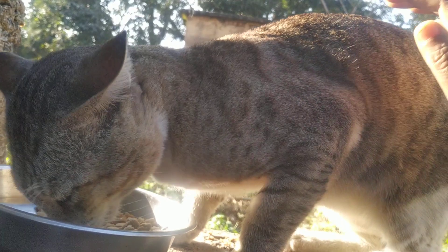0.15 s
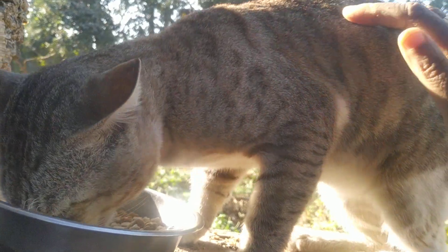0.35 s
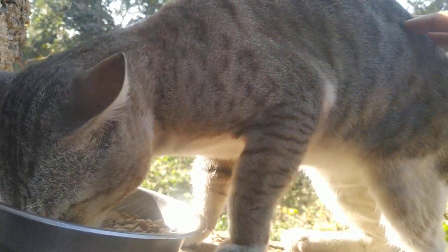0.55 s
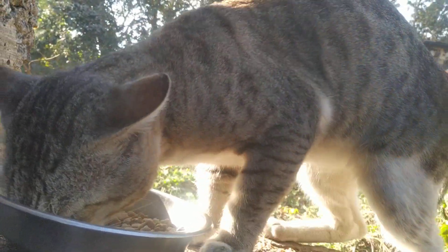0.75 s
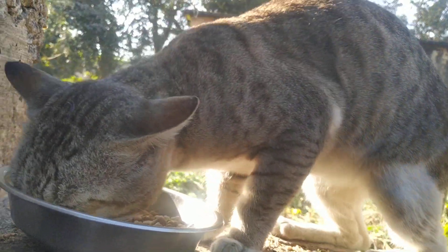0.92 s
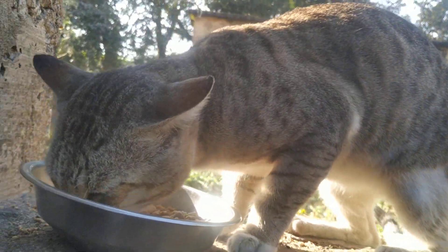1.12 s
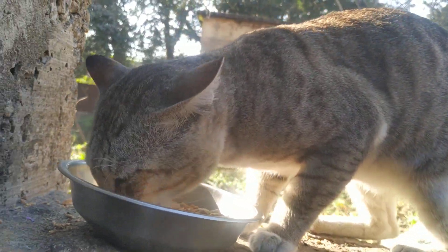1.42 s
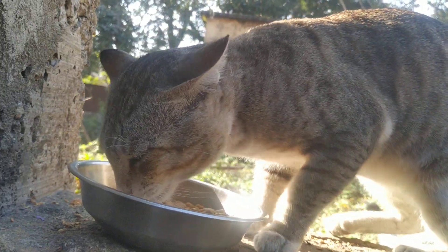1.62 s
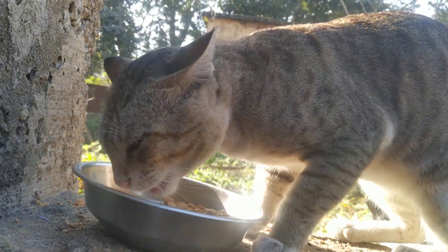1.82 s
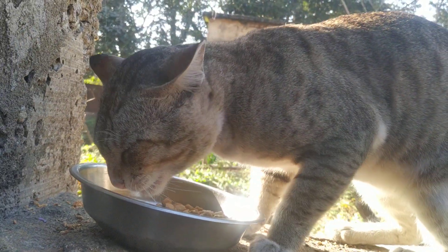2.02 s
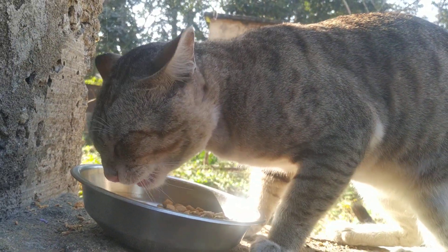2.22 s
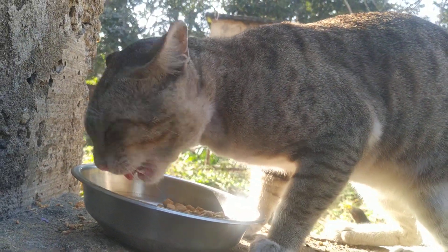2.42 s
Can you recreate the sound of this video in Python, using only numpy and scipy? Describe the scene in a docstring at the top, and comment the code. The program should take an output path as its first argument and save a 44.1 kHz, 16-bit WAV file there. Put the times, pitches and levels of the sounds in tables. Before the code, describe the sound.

A nearby crow caws harshly at about 0.2-0.55 and 1.0-1.35 seconds, rough and nasal with short outdoor echoes. Fainter far crows call at the start, 0.75 and 1.5-1.85. A cat cracks dry food close up at 0.87 and 1.0, then from 1.8 to 2.3, sharpest near 1.98. A faint rustle comes at 1.8, a thin bird whistle from 2.2 and a chirp at 2.4, over low traffic rumble and soft hush.

```python
"""Traffic rumble and outdoor hush (shaped noise) run throughout. Far crows (sinking beating harmonics)
call from the start; a near crow caws twice, two voice sides mixing into rough combination tones.
Between, during and after the caws a cat cracks dry food close by (rings, snaps, knocks, grit); a faint
treble rustle follows the second caw. Near the end a small bird whistles thinly (wavering sine and
overtone) and chirps once (narrow noise)."""
import sys
import numpy as np
from scipy import signal
from scipy.fft import rfft, irfft
from scipy.io import wavfile
from scipy.ndimage import uniform_filter1d

SR = 44100
rng = np.random.default_rng(int(sys.argv[2]) if len(sys.argv) > 2 else 0)


def field_ratio(decibels):
    """Amplitude ratio for a level in dB (20 dB per decade); scalars and array-likes work."""
    return 10 ** (np.asarray(decibels, dtype=float) / 20)


def to_wav(sig):
    """Store sig (one row per channel, or 1-D mono) as 16-bit WAV at the path in sys.argv[1].

    Samples outside -1..1 are clipped; the rate is SR.
    """
    pcm = np.clip(np.atleast_2d(sig), -1, 1) * 32767
    pcm = np.round(pcm).astype(np.int16)
    wavfile.write(sys.argv[1], SR, pcm.T)  # frames by channels


N = 112454  # samples


def evened(x):
    """Scale to rms 1."""
    return x / np.sqrt(np.mean(x ** 2) + 1e-20)


def read(points, hz):
    """Interpolate a two-column table on a log frequency axis."""
    f, value = np.transpose(points)
    return np.interp(np.log(hz + 1), np.log(f + 1), value)


def add(mix, start_s, sound):
    """Add a sound in place, cut at the end of the mix."""
    part = mix[..., round(start_s * SR):][..., :sound.shape[-1]]
    part += sound[..., :part.shape[-1]]


def coloured(x, points):
    """Filter by a table of f/Hz, gain/dB."""
    return irfft(rfft(x) * field_ratio(read(points, np.fft.rfftfreq(len(x), 1 / SR))), len(x))


def drift(n, cutoff_hz):
    """Low-passed noise of rms 1: slow random wander."""
    settle = 4000
    noise = rng.standard_normal(n + settle)
    return evened(signal.lfilter(*signal.butter(2, cutoff_hz, fs=SR), noise)[settle:])


def resonate(x, hz, width_hz):
    """One-pole resonance of peak gain 1: shift to 0 Hz, low-pass, shift back."""
    turn = np.exp(2j * np.pi * hz * np.arange(len(x)) / SR)
    r = np.exp(-np.pi * width_hz / SR)
    return 2 * (turn * signal.lfilter([1 - r], [1, -r], x / turn)).real


def panned(x, left_minus_right_db):
    """Stereo by level difference."""
    half_db = left_minus_right_db / 2
    return x * field_ratio(np.array([[half_db], [-half_db]]))


# noise spectrum before overall scaling: f/Hz, level/dB
AIR_SPECTRUM = [(12, -42), (20, -1.5), (69, -0.5), (212, -13.5), (583, -26), (863, -24.5), (1080, -23.5),
                (3940, -30.5), (5360, -35.5), (6910, -32.5), (7510, -38), (15200, -49.5), (16500, -58)]
# likeness of the two channels: f/Hz, correlation/1
AIR_LIKENESS = [(30, 0.89), (150, 1), (300, 0.64), (700, 0.27), (1500, 0.067), (4000, 0.017),
                (12000, 0.033)]
# channel balance: f/Hz, left minus right/dB
AIR_BALANCE = [(60, -0.5), (110, 2), (200, -0.5), (380, 5), (700, 2.5), (1290, -1), (2380, 1.0), (4400, -1),
               (8120, -0.5), (15000, -1)]


def traffic_and_hush():
    """Partly correlated stereo noise; its spectrum drifts in time-frequency patches."""
    level_db, patch_db = -44.5, 1.21
    frames, hz = N // 512 + 5, np.fft.rfftfreq(2048, 1 / SR)
    a, b, c, d, patches = rng.standard_normal((frames, 1025, 5)).T
    patches = evened(uniform_filter1d(uniform_filter1d(patches, 20, 0), 8, 1))
    same = np.clip(read(AIR_LIKENESS, hz), -1, 1)[:, None]
    left = a + 1j * b
    right = same * left + np.sqrt(1 - same ** 2) * (c + 1j * d)
    half_db = read(AIR_BALANCE, hz)[:, None] / 2
    gain_db = read(AIR_SPECTRUM, hz)[:, None] + patch_db * patches + np.array([half_db, -half_db])
    spectrum = np.array([left, right]) * field_ratio(gain_db)
    return field_ratio(level_db) * evened(signal.istft(spectrum, nperseg=2048, noverlap=1536)[1][:, :N])


# echo decay: f/Hz, T60/s
YARD_T60 = [(500, 0.2), (1500, 0.27), (4000, 0.085), (12000, 0.051)]


def yard(x):
    """Sparse echoes from walls and trees, treble dying first."""
    taps = np.zeros((2, SR // 2))
    at = np.arange(300, SR // 2 - 20, 20)
    at = at + rng.integers(0, 20, (2, len(at)))
    np.put_along_axis(taps, at, rng.choice([-1., 1.], at.shape), 1)
    hz, t, z = signal.stft(taps, SR, nperseg=256)
    decay = field_ratio(-60 * t / read(YARD_T60, hz)[:, None])
    tail = signal.istft(z * decay, SR, nperseg=256)[1]
    return signal.fftconvolve(x[None], tail / np.linalg.norm(tail[0]), axes=1)[:, :N]


# far caws: start t/s, length/s, level/dB before the gains below, first f/Hz, last f/Hz
FAR_CAWS = [(0.0, .17, -59, 660, 640), (.74, .22, -56, 670, 610), (1.5, .22, -52, 700, 650),
            (1.64, .21, -54, 632, 592)]
# far throat peaks: f/Hz, width/Hz, level/dB
FAR_THROAT = [(1320, 300, 0), (1950, 400, -1), (2380, 120, -1)]


def far_crows():
    """Sinking harmonics 2-4 with a beat, plus noise, through throat resonances and yard echoes."""
    beat_hz, beat_depth, noise_gain, trim_db = 150, 1.1, 1.8, -1
    x = np.zeros(N)
    for start, length, db, hz, end_hz in FAR_CAWS:
        u = np.arange(0, length, 1 / SR) / length
        pitch_hz = hz + (end_hz - hz) * u ** 1.7 + 6 * drift(len(u), 30)
        phase = 2 * np.pi * np.cumsum(pitch_hz) / SR
        beat = 1 + beat_depth * np.cos(2 * np.pi * beat_hz * u * length)
        stack = evened(sum(np.cos(k * phase) for k in range(2, 5)))
        drive = beat * stack + noise_gain * rng.standard_normal(len(u))
        voice = evened(sum(field_ratio(d) * resonate(drive, f, w) for f, w, d in FAR_THROAT))
        envelope = field_ratio(db + trim_db + drift(len(u), 15)) * np.sin(np.pi * u) ** 0.36
        add(x, start, envelope * voice)
    return panned(.8 * x, 2) + .5 * yard(x)


# combination tones, level/dB: rows 2, 3, 4, 5 x low side; columns -3 .. +3 x beat
TONES = [
    [-21, -17, -11, -15, -2.5, -10, -18],
    [-18, -8, -5, -15, -5, -7, -11],
    [-10, -8, -9, -11, -12, -11, -16],
    [-22, -22, -20, -18, -25, -25, -30],
]
# throat peaks added to the tones: f/Hz, width/Hz, level/dB
THROAT = [(1427, 126, 0), (1747, 116, 4)]


def voice_sides(a, b, u):
    """Combination tones of two voice sides; late in the caw the sum tone takes over."""
    wobble_db, unlock_at = 2.2, .82  # unlock_at: share of the caw
    low = a - b / 2
    sides = 0
    for k, row in enumerate(TONES, 2):
        for m, level_db in enumerate(row, -3):
            if (k, m) != (2, 1):  # the sum tone, added below
                tone = np.cos(k * low + m * b + 2 * np.pi * rng.random())
                sides = sides + field_ratio(level_db + wobble_db * drift(len(u), 10.5)) * tone
    sides = sides + sum(field_ratio(d) * resonate(sides, f, w) for f, w, d in THROAT)
    end = np.clip((u - unlock_at) / .05, 0, 1)
    start = np.clip(1 - u / .3, 0, 1)
    sum_tone = field_ratio(TONES[0][4] + 3 * end - 5 * start) * np.cos(2 * a)
    return sum_tone + sides * field_ratio(-11 * end)


# throat colour of the rasp: f/Hz, gain/dB
RASP_COLOUR = [(240, -65), (400, -19.5), (511, -20), (570, -13.5), (692, -30), (1000, -37), (1170, -20),
               (1470, 4), (1790, 5.5), (2180, -3), (3000, -40), (3900, -83), (6600, -120)]
# colour of the breath hiss: f/Hz, gain/dB
HISS_COLOUR = [(1530, -39), (2600, -9), (3060, -14.5), (3570, -5.5), (4470, -11), (5090, -6.5),
               (10600, -9.5), (11700, -18.5), (12800, -23), (15000, -17), (16500, -80)]
# peak added to the hiss: f/Hz, width/Hz, level/dB
BEAK = (3560, 220, 7)


def breath(a, b):
    """Throat rasp and breath hiss: noise puffed at the beat and the low side's rate."""
    puff_depth = 0.24
    puffs = 1 + puff_depth * np.cos(b) + puff_depth * np.cos(a - b / 2)
    rasp, hiss = (evened(coloured(puffs * rng.standard_normal(len(a)), colour))
                  for colour in (RASP_COLOUR, HISS_COLOUR))
    beak_hz, beak_width_hz, beak_db = BEAK
    return rasp, hiss + field_ratio(beak_db) * resonate(hiss, beak_hz, beak_width_hz)


# roughness over a caw: share of length/1, roughness/1
ROUGHNESS = [(0, .65), (.2, .58), (.45, .42), (.6, .27), (.8, .3), (.9, .55), (1, .7)]


def caw(rows):
    """Two-sided tones blurred by an unsteady beat; roughness trades tone for rasp."""
    beat_jitter_hz, sum_jitter_hz, hiss_db, trim_db = 9, 4, -10.5, -0.5
    s, *columns = np.transpose(rows)
    t = np.arange(s[0], s[-1], 1 / SR)
    db, sum_hz, beat_hz = (np.interp(t, s, column) for column in columns)
    n = len(t)
    u = np.arange(n) / n
    rough = np.interp(u, *np.transpose(ROUGHNESS))
    a = np.pi * np.cumsum(sum_hz + sum_jitter_hz * rough * drift(n, 60)) / SR  # half the sum phase
    b = 2 * np.pi * np.cumsum(beat_hz + beat_jitter_hz * rough * drift(n, 32.6)) / SR
    tones = evened(voice_sides(a, b, u))
    rasp, hiss = breath(a, b)
    voice = np.sqrt(1 - rough ** 2) * tones + rough * rasp + field_ratio(hiss_db) * hiss
    return s[0], voice * field_ratio(db + trim_db)


# per caw: t/s, level/dB before trim, sum tone of both voice sides f/Hz, beat between them f/Hz
CAWS = [
    [(.17, -60, 700, 82), (.205, -41, 770, 82), (.236, -34, 890, 82), (.27, -32, 940, 82),
     (.3, -30, 977, 82), (.34, -29, 996, 83), (.38, -28, 1012, 82), (.42, -27, 1031, 80),
     (.46, -28, 1020, 79), (.505, -31.5, 985, 80), (.525, -36, 770, 80), (.545, -43, 550, 80),
     (.565, -58, 480, 80)],
    [(.97, -60, 700, 83), (1.0, -42, 760, 83), (1.03, -35.5, 870, 83), (1.06, -31.5, 945, 83),
     (1.085, -30, 991, 83), (1.12, -29.5, 1002, 83), (1.2, -28.5, 1020, 83.5), (1.24, -28, 1015, 83),
     (1.28, -30, 996, 82), (1.303, -33, 955, 82), (1.328, -37, 750, 82), (1.352, -44, 550, 82),
     (1.375, -58, 480, 82)],
]
# channel phase: f/Hz, left lead/rad
CAW_PHASE = [(0, 0), (1030, 0.3), (2150, 2.7), (3790, 3.8), (5000, 6.3), (6370, 6.4), (8180, 9.4),
             (9300, 9.8), (10500, 12.4), (12100, 12.6), (13200, 8.4), (13800, 3.0), (14900, 4.1),
             (16300, 2.0)]
# channel balance: f/Hz, left minus right/dB
CAW_BALANCE = [(60, -1), (110, 2.0), (200, -9), (380, 3.0), (700, -0.5), (1290, 2), (2380, -6), (4400, 3.5),
               (8120, -12), (15000, 4.5)]


def near_crow():
    """Both caws reach two microphone ports at slightly different times; the yard echoes."""
    echo_db = -7.5
    x = np.zeros(N)
    for rows in CAWS:
        add(x, *caw(rows))
    hz = np.fft.rfftfreq(N, 1 / SR)
    half = field_ratio(read(CAW_BALANCE, hz) / 2) * np.exp(.5j * np.interp(hz, *np.transpose(CAW_PHASE)))
    return irfft(rfft(x) * np.array([half, 1 / half]), N) + field_ratio(echo_db) * yard(x)


# cracks of dry food: t/s, level/dB, ring f/Hz, then re level: knock/dB, snap/dB, crumbling/dB;
# left minus right/dB
CRACKS = [(.8658, -38, 4200, -12, 1, -4, -5), (1.0051, -34, 2350, -25, -22, -9, -3),
          (1.0219, -22, 3300, -30, -24, -9, -4), (1.79, -52, 1100, 0, -20, -20, 0),
          (1.81, -54, 9000, -25, 2, -3, 1), (1.8813, -45, 9000, -20, 3, -8, 5),
          (1.9117, -49, 7000, -20, 0, -5, 2), (1.9612, -32, 3200, -9, -2, -7, -2),
          (1.9753, -29, 4870, -30, -10, -20, 7), (1.977, -17, 5050, -40, 4, -27, 8.5),
          (2.0914, -48, 4070, -14, -19, -8, 4), (2.11, -46, 2900, -14, -16, -8, 4),
          (2.2542, -34, 5800, -9, -3, -8, -3), (2.2868, -33, 4300, -14, -1, -8, -3)]


def food_cracks():
    """Each crack: a short ring, a treble snap, a dull knock and a crumbling tail."""
    ring_cycles, rise_s = 18, .0001  # cycles to fall 60 dB; rise time constant
    snap_hz, snap_t60_s = 11200, .0022
    knock_hz, knock_t60_s, crumb_t60_s = 1130, .031, .03
    out, t = np.zeros((2, N)), np.arange(2500) / SR
    for s, db, hz, knock_db, snap_db, crumb_db, pan_db in CRACKS:
        noise = rng.standard_normal((3, len(t)))
        ring = np.sin(2 * np.pi * hz * t) * field_ratio(-60 * t * hz / ring_cycles)
        snap = np.sin(2 * np.pi * snap_hz * t) * field_ratio(snap_db - 60 * t / snap_t60_s)
        knock = field_ratio(knock_db - 60 * t / knock_t60_s) * evened(resonate(noise[0], knock_hz, 700))
        grit = evened(resonate(resonate(noise[1], hz, .55 * hz), hz, .55 * hz))
        grit = grit + field_ratio(snap_db) * evened(resonate(noise[2], snap_hz, 8000))
        crumble = field_ratio(crumb_db - 60 * t / crumb_t60_s) * grit
        sound = (ring + snap + knock + crumble) * (1 - np.exp(-t / rise_s))
        add(out, s, panned(field_ratio(db) * sound, pan_db))
    return out


# rustle by the bowl: start t/s, length/s, level/dB, f/Hz
RUSTLE = (1.75, .2, -60, 10000)


def bowl_rustle():
    """Faint treble noise, independent per channel, flickering in level."""
    out = np.zeros((2, N))
    start, length, db, hz = RUSTLE
    n = round(length * SR)
    rows = []
    for noise in rng.standard_normal((2, n)):
        envelope = field_ratio(db + 6.1 * drift(n, 40)) * np.hanning(n)
        rows.append(envelope * evened(resonate(noise, hz, 5000)))
    add(out, start, np.array(rows))
    return out


# whistle: t/s, f/Hz, level/dB
WHISTLE = [(2.17, 6814, -72), (2.18, 6877, -71), (2.23, 6724, -45.5), (2.242, 6761, -59),
           (2.258, 6716, -51), (2.27, 6665, -65), (2.288, 6725, -54), (2.35, 6761, -63), (2.358, 6756, -52),
           (2.376, 6740, -66), (2.412, 6748, -58), (2.52, 6687, -78)]
# chirp: start t/s, length/s, level/dB, f/Hz
CHIRP = (2.42, .065, -61, 3850)


def small_bird():
    """A thin trembling whistle with an overtone, and one short chirp of resonant noise."""
    overtone_db, fuzz, pan_db = -19, .3, -2
    s, hz, db = np.transpose(WHISTLE)
    t, out = np.arange(s[0], s[-1], 1 / SR), np.zeros(N)
    phase = 2 * np.pi * np.cumsum(np.interp(t, s, hz) + 30 * drift(len(t), 88)) / SR
    envelope = np.sqrt(2) * field_ratio(np.interp(t, s, db)) * (1 + fuzz * drift(len(t), 70))
    add(out, s[0], envelope * (np.sin(phase) + field_ratio(overtone_db) * np.sin(2 * phase)))
    start, length, chirp_db, chirp_hz = CHIRP
    n = round(length * SR)
    chirp = evened(resonate(rng.standard_normal(n), chirp_hz, 208))
    add(out, start, field_ratio(chirp_db) * np.hanning(n) * chirp)
    return panned(out, pan_db)


def scene():
    """Sum all sources."""
    return traffic_and_hush() + far_crows() + near_crow() + food_cracks() + bowl_rustle() + small_bird()


def band_limit(x):
    """A steep low-pass at the top of the band."""
    return signal.sosfilt(signal.butter(12, 16670, fs=SR, output="sos"), x)


def record(dry):
    """Deliver the finished mix."""
    return band_limit(dry)


dry = scene()
out = record(dry)
to_wav(out)
```